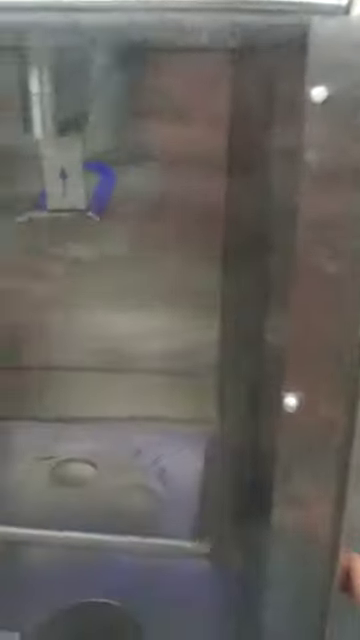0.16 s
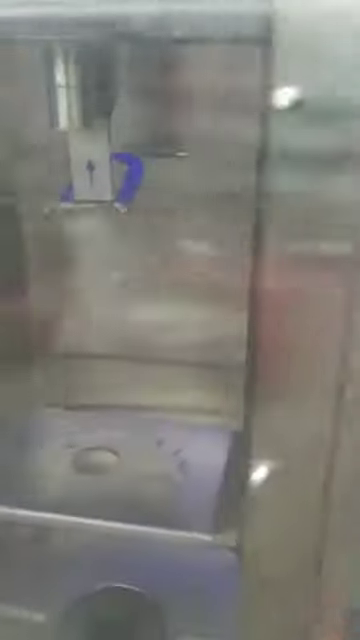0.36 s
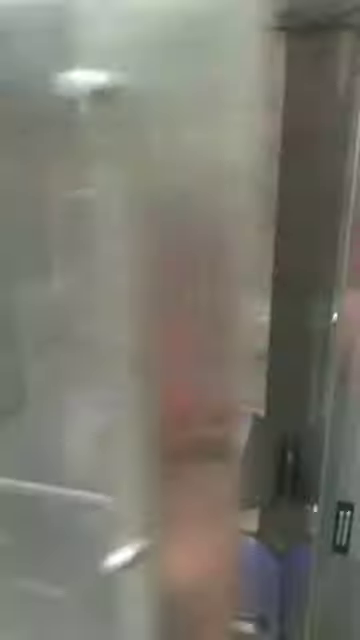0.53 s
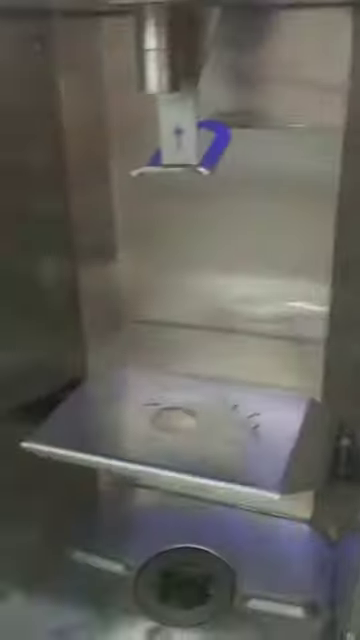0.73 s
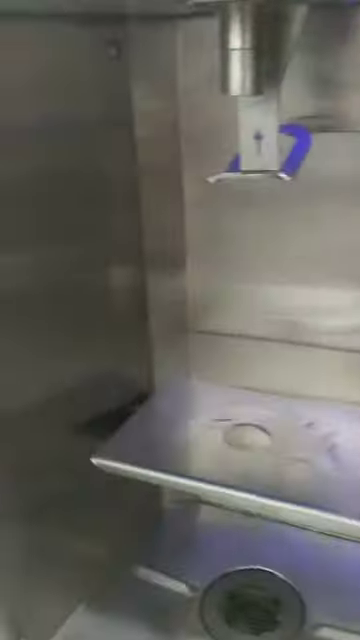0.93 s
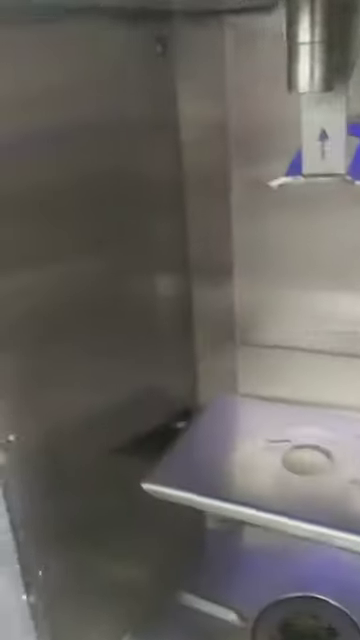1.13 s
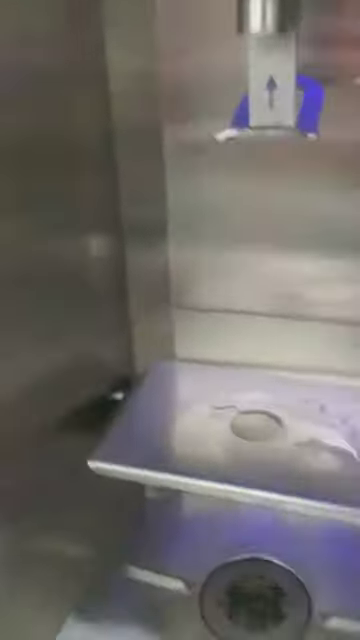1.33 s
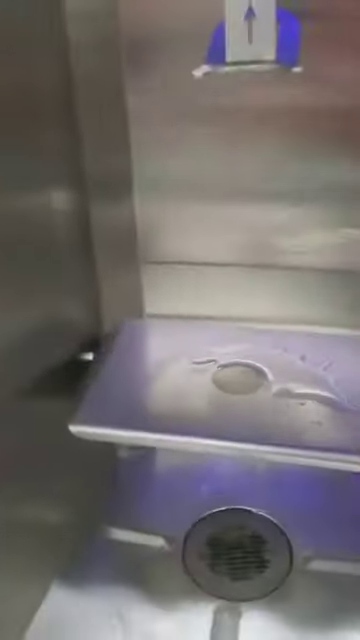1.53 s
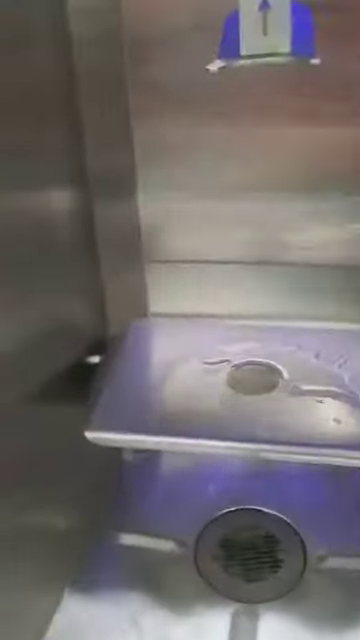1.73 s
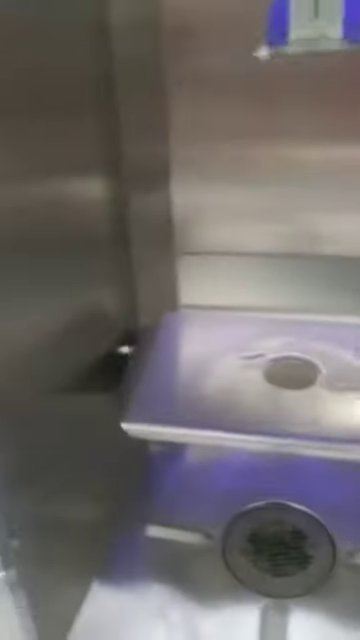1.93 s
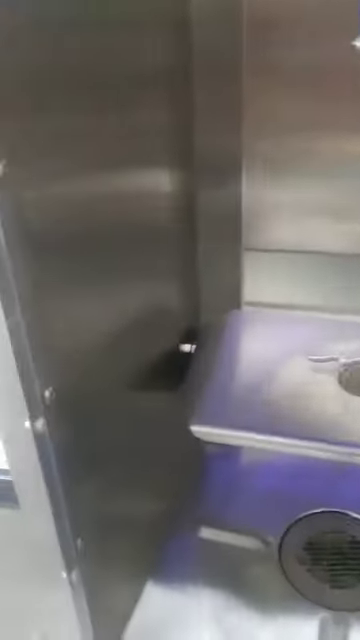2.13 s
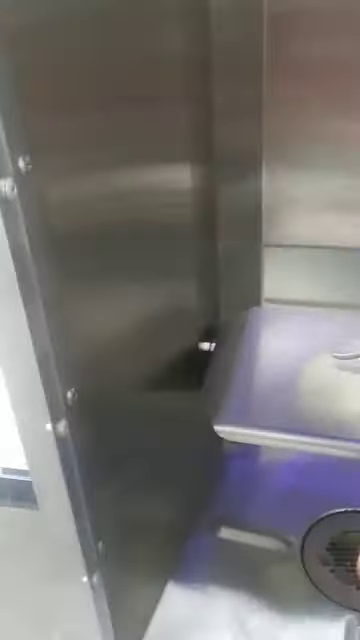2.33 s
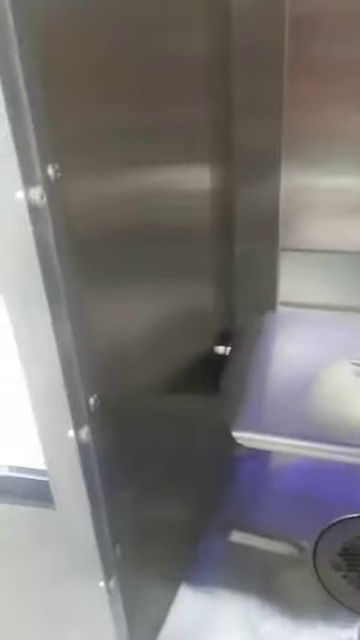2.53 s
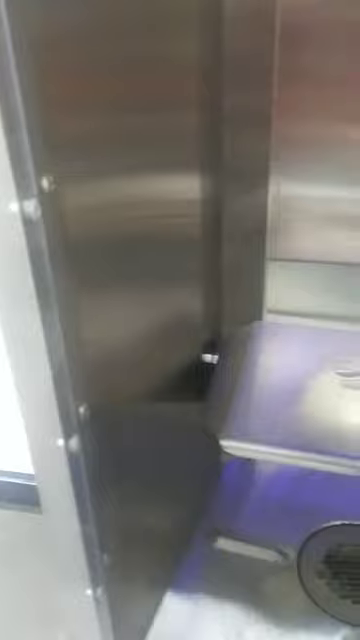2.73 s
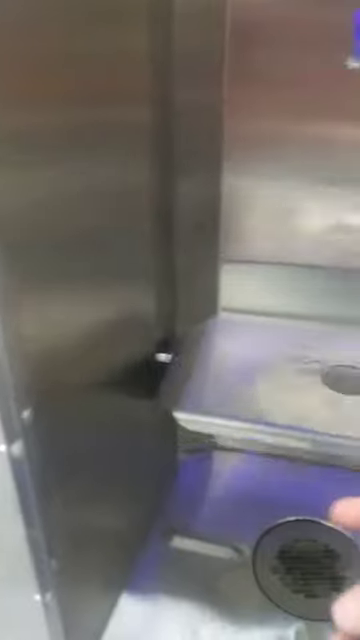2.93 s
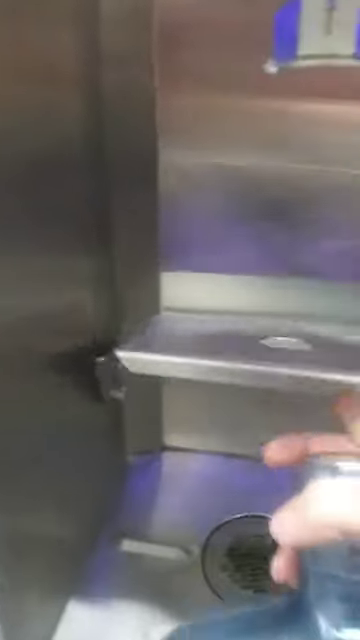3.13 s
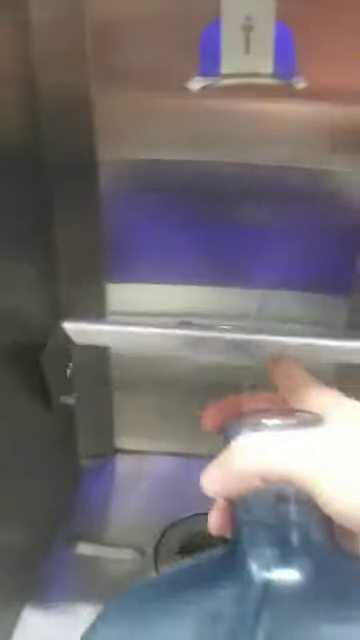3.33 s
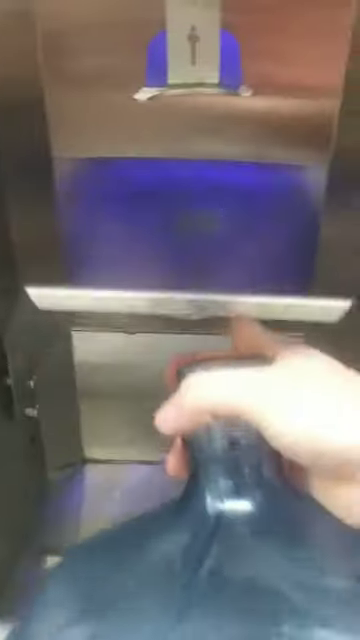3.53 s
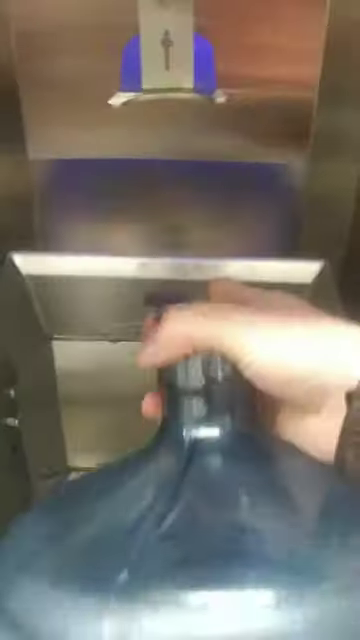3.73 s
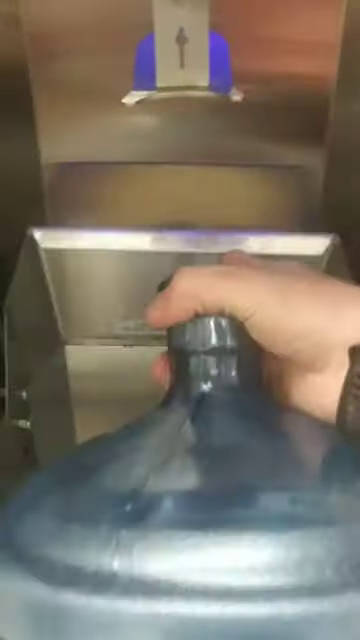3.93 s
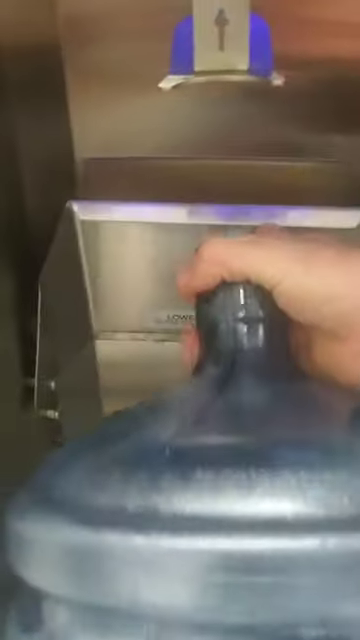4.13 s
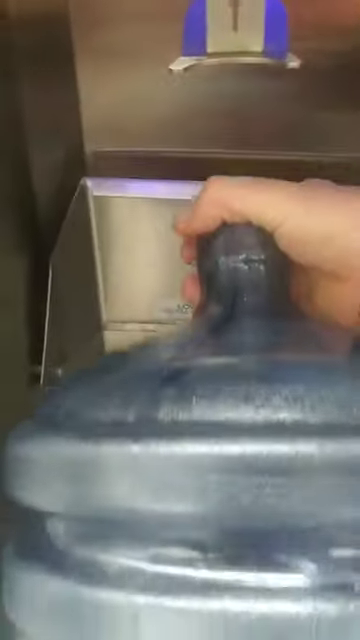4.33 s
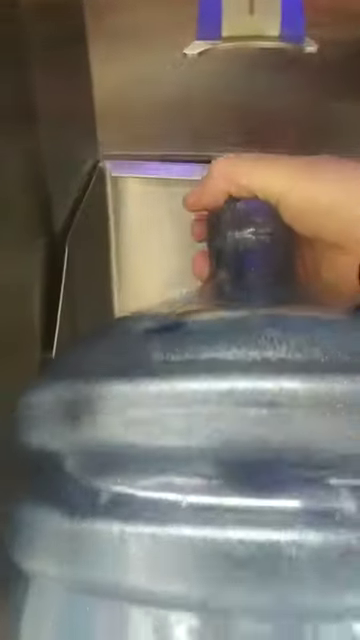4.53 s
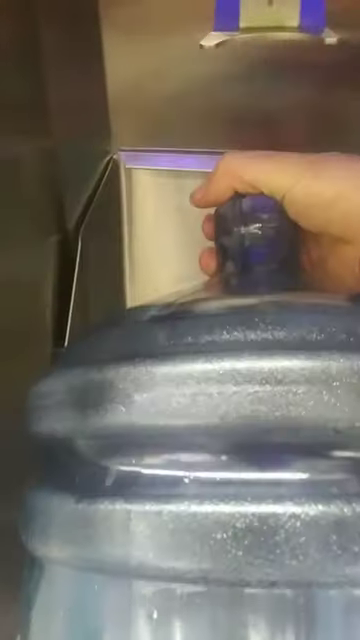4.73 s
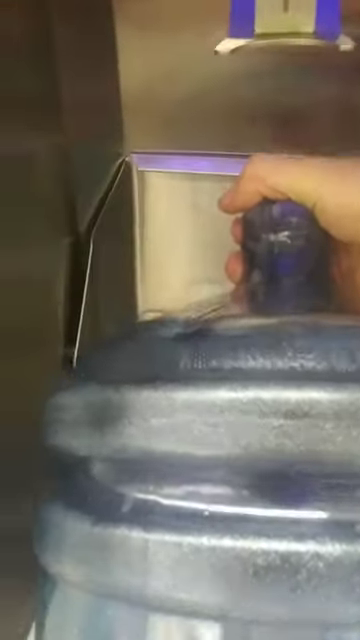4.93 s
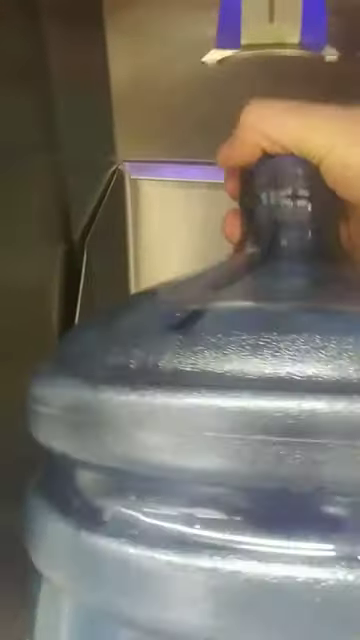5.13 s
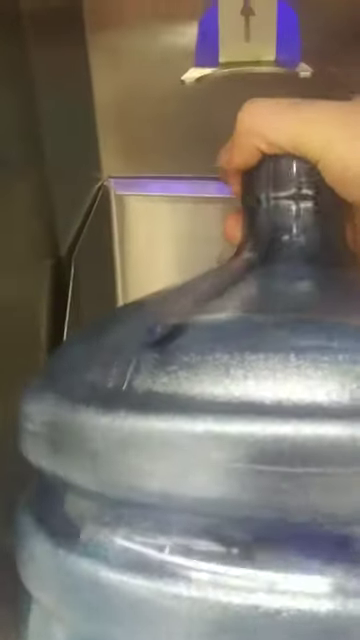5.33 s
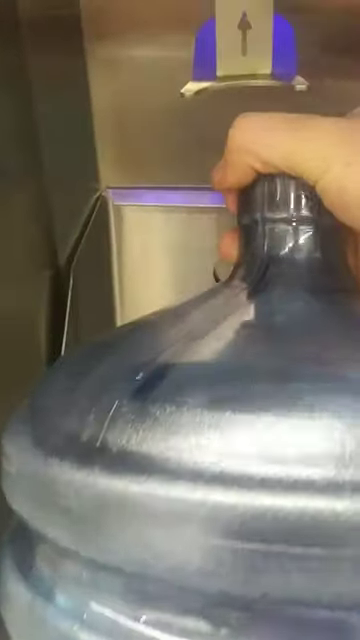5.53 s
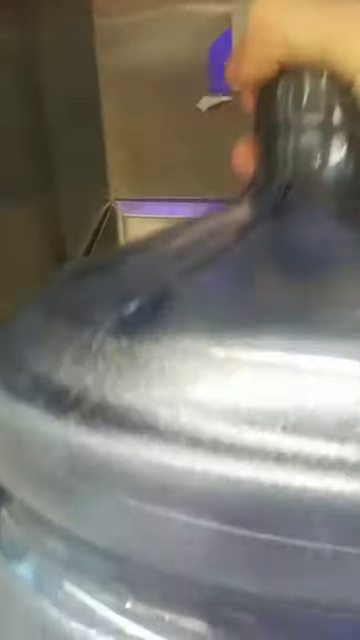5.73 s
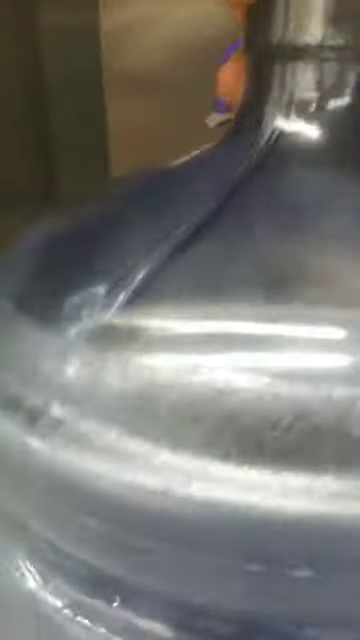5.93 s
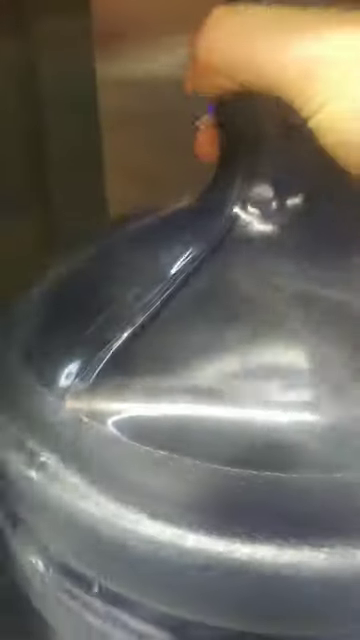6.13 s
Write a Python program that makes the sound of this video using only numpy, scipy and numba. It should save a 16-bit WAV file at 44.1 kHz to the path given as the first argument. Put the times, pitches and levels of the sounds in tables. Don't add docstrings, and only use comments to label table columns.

```python
import sys
import numpy as np
from scipy import signal
from scipy.fft import rfft, irfft, next_fast_len
from scipy.io import wavfile
from scipy.ndimage import uniform_filter1d, minimum_filter1d
from numba import njit

SR = 44100
rng = np.random.default_rng(int(sys.argv[2]) if len(sys.argv) > 2 else 0)


def output_pcm(signal):
    pcm = np.clip(np.atleast_2d(signal).T, -1, 1) * 32767
    wavfile.write(sys.argv[1], SR, np.round(pcm).astype(np.int16))


def decibels_to_gain(level_db):
    exponent = np.asarray(level_db, float) / 20
    return 10 ** exponent


N = 272097

# peak_s, level_db
BRUSHES = [(0.0, -45.5), (.03, -59), (0.055, -46), (.32, -67), (.44, -66), (1.11, -56.5), (1.401, -62),
           (1.53, -57.5), (1.749, -54), (1.94, -64)]
# peak_s, level_db, build_up_s, let_go_s, dull_share_db
SLIDES = [(.67, -58.5, 0.34, 0.4, -0.5), (.93, -66, 0.17, 0.12, 7), (1.96, -66, 0.13, 1.3, 1),
          (3.026, -48.5, 0.047, 0.23, -6.5), (3.085, -52.5, 0.12, 0.085, 0.5),
          (3.15, -67, 0.16, 0.83, -8.5), (3.58, -59, 0.55, 0.7, -15.5), (3.89, -54.5, 0.27, 0.24, 1),
          (4.3, -60.5, 0.17, 0.72, 1.5), (4.62, -57, 0.4, 0.49, -11), (5.06, -59, 0.23, 0.31, -1.5),
          (5.2, -60, 0.18, .12, 15), (5.44, -65.5, 0.1, 3.5, 6), (5.71, -56, 0.21, .1, 6),
          (2.76, -66, 0.22, 0.33, -19)]
# freq_hz, density_db_per_hz
HISS_COLOUR = [(2060, -64), (3500, -31), (4420, 1), (4630, -11), (4890, 6), (5850, -12.5), (6890, 8),
               (7940, 2), (8630, -79), (9500, -14), (12400, -51), (20900, -120)]
# time_s, hum_db, air_noise_db
MACHINE_LEVELS = [(0, -43.5, -44), (.4, -43.5, -45), (.7, -39.5, -44), (1.05, -43.5, -45), (1.2, -58, -45),
                  (1.6, -71, -45), (1.9, -45.5, -44), (2.9, -56.5, -44.5), (3.1, -42.5, -44.5),
                  (3.55, -49.5, -44), (5, -61, -42.5), (5.8, -40, -44), (6.17, -42.5, -47)]
# freq_hz, density_db_per_hz
AIR_COLOUR = [(18, -71), (30, -12), (86, -11), (109, -6), (170, -2), (210, -8), (295, -2), (801, -16.5),
              (1040, -17), (3140, -31), (5040, -34), (5590, -39), (7470, -34.5), (13700, -62), (16000, -54)]
# start_s, peak_db, tilt_db_per_octave
TICKS = [(0.048, -43, 9), (0.322, -30.5, 4.5), (0.3342, -31, 0.5), (0.4369, -44, 4), (0.8365, -37, -16),
         (1.1094, -51, 11), (1.7449, -53, 9), (1.9475, -39, 20), (1.9839, -43, 7), (2.0973, -39.5, 1.5)]
# start_s, peak_db, tilt_db_per_octave, ring_t60_s, clack_hz
CRACKS = [(2.4726, -18, 1, 0.15, 1580), (2.5412, -38, 3, 0.066, 2330), (2.6503, -34.5, 5, 0.12, 1598),
          (3.596, -17.5, -3, 0.1, 2740), (3.713, -28.5, -1, 0.067, 3600),
          (3.8018, -29.5, -1.5, 0.082, 2500), (3.8437, -32, -5, 0.08, 2420), (3.9394, -43, 3, 0.26, 1530),
          (4.0346, -36, 0, 0.15, 2090), (4.3169, -31, -1.5, 0.18, 1830), (4.3689, -32, -4, 0.19, 2330),
          (4.4804, -31, -1, 0.27, 1820), (4.5094, -32.5, 0.5, 0.11, 2030), (4.707, -1, 1, 0.09, 2020),
          (5.136, -30.5, 0, 0.36, 1880), (5.1683, -27.5, -4, 0.18, 1780), (5.229, -24.5, -2, 0.047, 1560),
          (5.286, -0.5, 0.5, 0.089, 1690), (5.3294, -35, 3.5, 0.33, 1640), (5.3835, -9.5, -3.5, 0.09, 1840),
          (5.4282, -28.5, -1, 0.21, 1700), (5.706, -29, 1, 0.17, 1880), (5.723, -11, -3.5, 0.1, 1870),
          (5.8058, -15.5, -0.5, 0.12, 1870)]
# freq_hz, density_db_per_hz
CRACK_COLOUR = [(290, 0.5), (500, 1.5), (795, 1.5), (1000, -8), (1420, -6), (2260, -10), (2650, -10),
                (2890, -9.5), (4400, -15), (4730, -8), (5630, -17), (7420, -12.5), (8830, -23),
                (14000, -25), (16000, -35)]
# freq_hz, width_hz, level_db
PLATE_MODES = [(1100, 150, 0), (1470, 320, -1), (1880, 12, -2), (2290, 38, -2), (3260, 10, -7),
               (3630, 34, -7), (4170, 490, -7), (4360, 11, -7), (5180, 16, -5), (5400, 160, -8),
               (6050, 23, -14), (7080, 68, -7), (7480, 650, -8), (6720, 190, -7)]
# start_s, force_db, jug_side_ring_db, jug_base_ring_db, steel_panel_ring_db
BLOWS = [(0.324, -31, -53.5, -61, -43), (2.473, -14.5, -55, -22, -42), (2.484, -11, -35.5, -31, -24.5),
         (3.594, -5.5, -25.5, -22, -27.5), (3.711, -8, -27, -23.5, -25), (3.801, -7.5, -25, -21.5, -29),
         (3.844, -8, -24.5, -21, -33), (3.93, -17, -31.5, -25, -41), (4.036, -17, -35, -29.5, -32),
         (4.314, -14.5, -27.5, -25.5, -29.5), (4.48, -29.5, -32.5, -39, -33),
         (4.706, -5.5, -46, -30.5, -15.5), (5.091, -35, -45, -38, -37), (5.141, -25, -27.5, -43, -24.5),
         (5.198, -14.5, -25.5, -47, -25.5), (5.284, -4, -17.5, -19, -8.5), (5.329, -11.5, -27, -45, -14.5),
         (5.383, -10, -21.5, -39, -34), (5.449, -19, -32.5, -33, -26), (5.499, -26.5, -29, -35, -30.5),
         (5.578, -26.5, -35, -43, -28.5), (5.725, -8, -28, -26, -18), (5.803, -15, -32, -27, -20.5)]
# freq_hz, level_db, t60_s
RING_MODES = [(117.74, 1.5, 4.8), (167.8, 1.5, 0.67), (188.4, 1.5, 0.47), (214.9, 5.5, 0.51),
              (246.2, 2.5, 1.9), (317, -6, 1), (360.7, 3, 0.42), (393, 3, 0.36), (428, 0, 0.37),
              (457.6, -4.5, 0.61), (546, -1, 0.18), (622.3, -4, 0.26), (692, -1.5, 0.069),
              (753, -5.5, 0.088), (800, -19, 0.68), (846, -5.5, 0.12), (932, -12, 0.21), (1157, -19, 0.049),
              (1302, -14.5, 0.28), (97.3, -5, 3.3)]
MODE_DRIVE = (0, 1, 1, 4, 0, 3, 2, 5, 5, 3, 3, 3, 3, 3, 2, 5, 5, 5, 5, 0)
# time_s, extra_fall_db_per_s
GRIP = [(3.5, -3), (3.6, 71), (4.25, 19), (4.6, 20), (4.71, 98), (5.05, 2), (5.3, -2), (5.75, 86),
        (5.95, 57)]
# freq_hz, density_db_per_hz
THUD_COLOUR = [(35, -56), (100, -5), (400, 5.5), (907, -21), (1110, -7), (1280, -45), (1720, -70),
               (1860, -48), (2500, -19), (3250, -83), (5500, -120)]
# peak_s, rubbing_force_db, build_up_s, let_go_s
DRAGS = [
    (3.9, -36, 0.34, 0.19),
    (4.5, -54, 0.77, 0.08),
    (5.17, -50, 0.083, 0.12),
    (5.3, -31, 0.055, 0.31),
    (5.7, -39.5, 0.26, 0.67),
]
# start_s, length_s, pitch_hz, level_db
SQUEAKS = [(4.98, 0.079, 4300, -57), (5.0, 0.044, 3500, -59), (5.55, 0.05, 1960, -59),
           (5.83, .13, 1350, -53), (5.0, .07, 2300, -58), (3.09, 0.1, 4750, -61), (3.1, .1, 6700, -58),
           (3.1, .45, 5150, -62)]


def curve(table):
    s, *columns = np.transpose(table)
    return [np.interp(np.arange(N) / SR, s, column) for column in columns]


def colour(x, points, tilt_db=0., modes=(), modes_db=0.):
    hz, db = np.transpose(points)
    size = next_fast_len(len(x))
    f = np.maximum(np.fft.rfftfreq(size, 1 / SR), 1)
    octave = np.log2(f)
    bumps = sum(modes_db / (1 + (2 * (f - mode) / (width + 50)) ** 2) for mode, width, _ in modes)
    tilt = tilt_db * (np.clip(octave, 9, 14) - 12)
    gain_db = np.interp(octave, np.log2(hz), db) + tilt + bumps
    y = irfft(rfft(x, size) * decibels_to_gain(gain_db), size)[:len(x)]
    return y / np.sqrt(np.mean(y ** 2))


def band(x, lo_hz, hi_hz):
    y = signal.sosfilt(signal.butter(2, [lo_hz, hi_hz], "bandpass", fs=SR, output="sos"), x)
    return y / np.sqrt(np.mean(y ** 2))


def walk(rate_hz):
    hold = int(SR / rate_hz)
    steps = np.repeat(rng.standard_normal(N // hold + 1), hold)
    return 1.42 * uniform_filter1d(uniform_filter1d(steps, hold), hold)[:N]


def swell(s, db, rise_s, fall_s):
    t = np.arange(N) / SR - s
    return decibels_to_gain(db - 20 * np.where(t < 0, -t / max(rise_s, .005), t / max(fall_s, .005)))


def fade(t60_s, rise_s):
    t = np.arange(int(.4 * SR)) / SR
    return (1 - np.exp(-t / rise_s)) * decibels_to_gain(-60 * t / max(t60_s, .01))


def add(out, s, burst):
    i = int(s * SR)
    out[i:i + len(burst)] += burst[:N - i]


def sliding():
    brush_rise_s, brush_fall_s, brush_dull_db = 0.047, 0.039, -8.5
    strokes = SLIDES + [(s, db, brush_rise_s, brush_fall_s, brush_dull_db) for s, db in BRUSHES]
    rest = swell(5.2, -70, 100, 0.44)
    hiss, dull = rest, rest * decibels_to_gain(-12)
    for s, db, rise_s, fall_s, dull_db in strokes:
        stroke = swell(s, db, rise_s, fall_s)
        hiss = hiss + stroke
        dull = dull + stroke * decibels_to_gain(dull_db)
    grain_db = 2.3 * rng.exponential(size=N) + 1.7 * walk(60)
    grain = rng.standard_normal((3, N)) * decibels_to_gain(grain_db)
    bright = colour(grain[0], HISS_COLOUR) + decibels_to_gain(-7.5) * band(grain[1], 7000, 14600)
    return hiss * bright + dull * band(grain[2], 1360, 4500)


def machine():
    hum_hz = 247.5
    hum_db, air_db = curve(MACHINE_LEVELS)
    air = colour(rng.standard_normal(N), AIR_COLOUR)
    low = signal.sosfilt(signal.butter(2, 500, fs=SR, output="sos"), air)
    air = low * decibels_to_gain(2.1 * walk(18)) + (air - low) * decibels_to_gain(1.15 * walk(16))
    phase = 2 * np.pi * np.cumsum(hum_hz * (1 + 0.004 * walk(11.5))) / SR
    return decibels_to_gain(air_db) * air + decibels_to_gain(hum_db + 1.2 * walk(9.0)) * np.sin(phase)


def contacts():
    tick_t60_s, tick_hz = 0.085, 2380
    out = np.zeros(N)
    split = signal.butter(2, 8500, fs=SR, output="sos")
    t = np.arange(int(.4 * SR)) / SR
    for s, db, tilt_db, t60_s, hz in [(*tick, tick_t60_s, tick_hz) for tick in TICKS] + CRACKS:
        edge = (1 - np.exp(-t / 0.00025)) * np.exp(-(t / (0.17 * t60_s)) ** 2)
        low_shape = edge + decibels_to_gain(-8.0) * fade(2.0 * t60_s, 0.00034) + decibels_to_gain(-30.0) * fade(2.7 * t60_s, 0.0024)
        top_shape = edge + decibels_to_gain(-38.0) * fade(t60_s, 0.00063)
        noise = rng.standard_normal((2, len(t)))
        spray = colour(noise[0], CRACK_COLOUR, tilt_db, PLATE_MODES, modes_db=4.0)
        spray = spray + decibels_to_gain(-11) * band(noise[1], hz / 1.16, hz * 1.205)
        low = signal.sosfilt(split, spray)
        top = spray - low
        add(out, s, decibels_to_gain(db - 11.0) * (low_shape * low + decibels_to_gain(1.5) * top_shape * top))
    return out


def box(x):
    tail = band(rng.standard_normal(int(.4 * SR)), 182, 3240) * fade(0.33, 0.00044)
    return decibels_to_gain(-18.5) * signal.fftconvolve(x, tail / np.sqrt(np.sum(tail ** 2)))[:N]


@njit
def ring(x, hz, fall):
    y, z, turn = np.empty(len(x)), 0j, 0j
    for i in range(len(x)):
        if i % 16 == 0:
            turn = np.exp(2j * np.pi * hz[i] / SR)
        z = z * turn * (1 - fall[i]) + x[i]
        y[i] = z.imag
    return y


def jug(rub):
    _, force, side, base, panel = np.transpose(BLOWS)
    overtone = force - 13.5
    shoulder = (force + side) / 2 - 8.5
    plate = (force + panel) / 2 - 12
    drive_db = [side, base, panel, overtone, shoulder, plate]
    scatter = rng.standard_normal((len(BLOWS), 3, len(RING_MODES)))
    at = (np.array(BLOWS)[:, 0] * SR).astype(int)
    last_blow = np.maximum(np.searchsorted(at, np.arange(N), side="right") - 1, 0)
    touch = np.zeros(N)
    touch[at - 66] = 1
    grip = np.maximum(curve(GRIP)[0], 0) + 14 * SR * uniform_filter1d(touch, size=132)
    flex = walk(14)
    out = np.zeros(N)
    for k, (hz, db, t60_s) in enumerate(RING_MODES):
        steel = MODE_DRIVE[k] == 2
        push = decibels_to_gain(-28.5) * rub + 1e-18
        push_db = drive_db[MODE_DRIVE[k]] + 3. + 2 * scatter[:, 0, k]
        push[at] += decibels_to_gain(push_db) * np.sign(scatter[:, 1, k])
        push = uniform_filter1d(push, size=int(SR / hz / 2), origin=int(SR / hz / 4) - 1)
        bend = .012 * scatter[last_blow, 2, k] + .013 * np.roll(flex, 5000 * k)
        pitch = hz * (1 + (.3 if steel else 1) * bend)
        reach = 0.17 if steel else (hz / 250) ** 0.1
        fall_db_per_s = 60 / t60_s + grip * reach
        out += decibels_to_gain(db) * ring(push, pitch, fall_db_per_s / 20 * np.log(10) / SR)
    return out


def thuds():
    out = np.zeros(N)
    shape = fade(0.13, 0.0057)
    for s, db, *_ in BLOWS:
        add(out, s, decibels_to_gain(db - 8.0) * shape * colour(rng.standard_normal(len(shape)), THUD_COLOUR))
    return out


def rubbing_force():
    drag = sum(swell(*row) for row in DRAGS)
    return drag * decibels_to_gain(1.77 * walk(35)) * rng.standard_normal(N)


def rumble(rub):
    return decibels_to_gain(-24.0) * band(rng.standard_normal(N), 95, 870) * uniform_filter1d(np.abs(rub), size=200)


def squeaks():
    out = np.zeros(N)
    for s, length_s, hz, db in SQUEAKS:
        size = int(length_s * SR)
        squeak = band(rng.standard_normal(size), hz / 1.02, hz * 1.02)
        add(out, s, decibels_to_gain(db) * np.hanning(size) ** 0.096 * squeak)
    return out


def thin(x, step_db, from_hz):
    f, t, z = signal.stft(x, SR, nperseg=2048)
    size = np.abs(z)
    patch = np.kron(rng.standard_normal((len(f) // 24 + 1, len(t) // 2 + 1)), np.ones((24, 2)))
    patch = patch[:len(f), :len(t)]
    near = uniform_filter1d(size, size=200, axis=0) + decibels_to_gain(step_db) * np.sum(size ** 2, axis=0) ** 0.88
    reach = np.clip((f[:, None] - from_hz) / 4000.0, 0, 1.5) + 3 * (f[:, None] > 14200)
    treble = np.sum(size[f > 3000] ** 2, axis=0)
    attack = treble > decibels_to_gain(32.) * np.roll(treble, 2)
    kept = (size > reach * near * decibels_to_gain(4. * patch)) | attack
    return signal.istft(z * kept, SR)[1][:N]


def hush(x, jump_db):
    top = signal.sosfiltfilt(signal.butter(2, 900, "highpass", fs=SR, output="sos"), x)
    now = -minimum_filter1d(-np.abs(top), size=440, origin=219)
    ahead = -minimum_filter1d(-np.abs(top), size=520, origin=-260)
    return x - top * uniform_filter1d(1. * (ahead > now * decibels_to_gain(jump_db)), size=44)


def scene():
    rub = rubbing_force()
    knocks = contacts() + jug(rub) + thuds() + rumble(rub) + squeaks()
    knocks = signal.sosfilt(signal.butter(4, 95, "highpass", fs=SR, output="sos"), knocks)
    return (sliding() + machine() + knocks + box(knocks))[None]


def roll_off(x):
    return signal.sosfilt(signal.butter(12, 16470, fs=SR, output="sos"), x)


def record(dry):
    x = signal.sosfilt(signal.butter(2, 80, "highpass", fs=SR, output="sos"), dry[0])
    x = signal.sosfilt(signal.ellip(8, .2, 70, 15800, fs=SR, output="sos"), x)
    gain = np.minimum(1, .72 / np.maximum(np.abs(x), 1e-9))
    gain = uniform_filter1d(minimum_filter1d(gain, size=441), size=221)
    x = signal.sosfilt(signal.butter(2, 60, "highpass", fs=SR, output="sos"), x * gain)
    x = thin(x, step_db=-60.5, from_hz=6600.0)
    x = hush(x, jump_db=30.0)
    return roll_off(x[None])


dry = scene()
out = record(dry)
output_pcm(out)
```